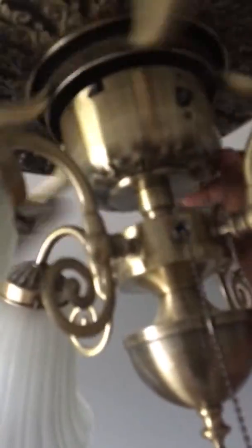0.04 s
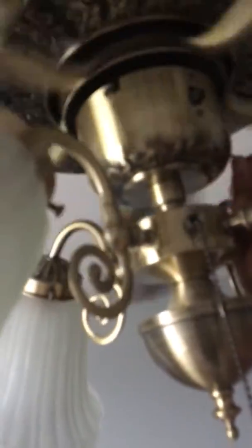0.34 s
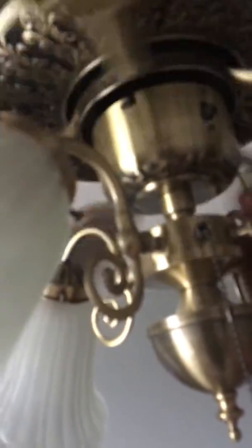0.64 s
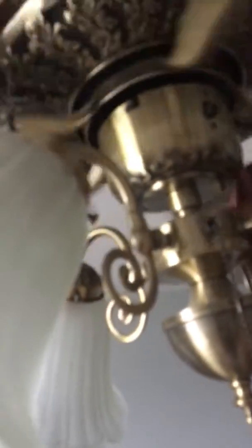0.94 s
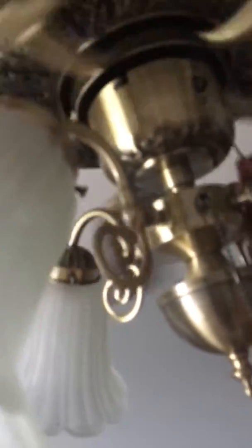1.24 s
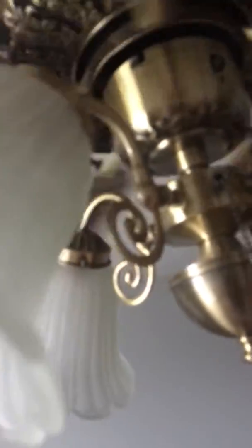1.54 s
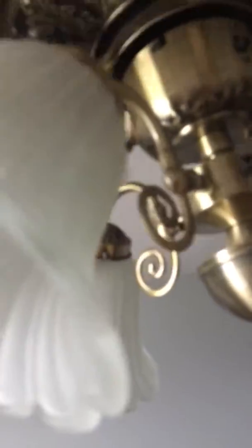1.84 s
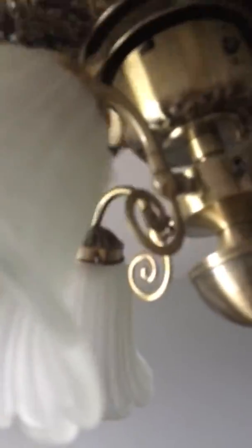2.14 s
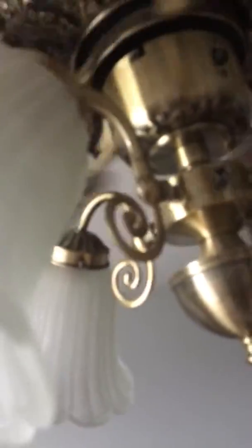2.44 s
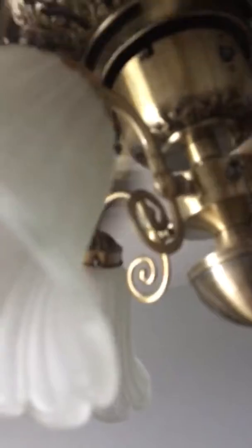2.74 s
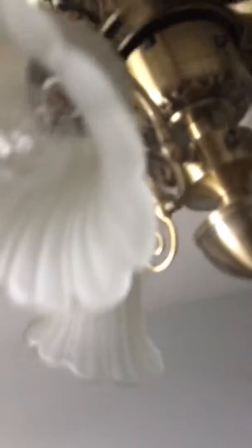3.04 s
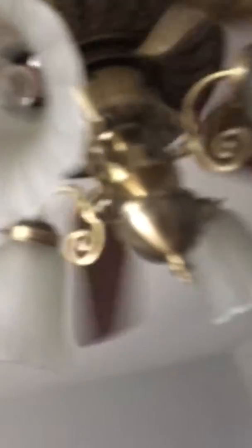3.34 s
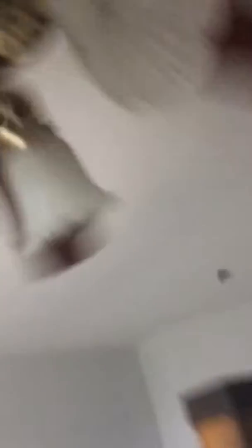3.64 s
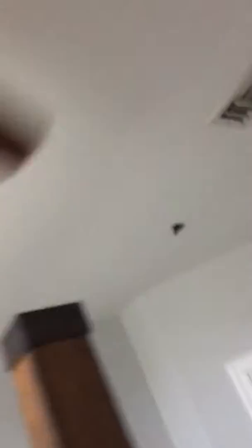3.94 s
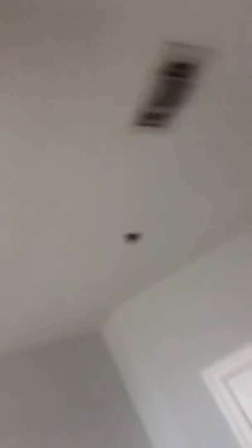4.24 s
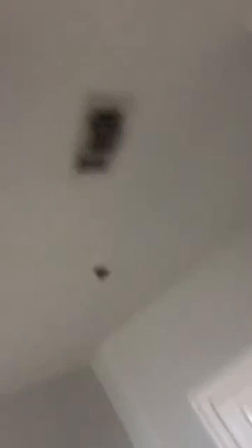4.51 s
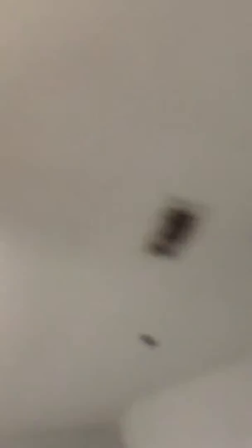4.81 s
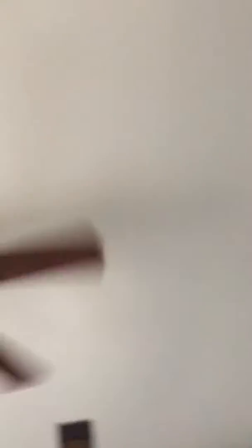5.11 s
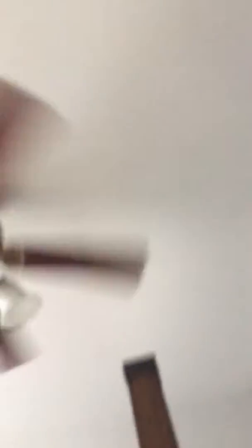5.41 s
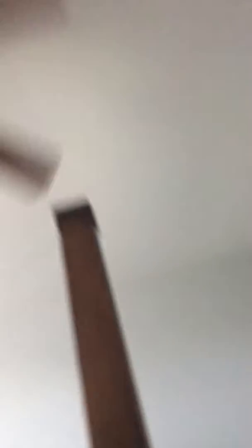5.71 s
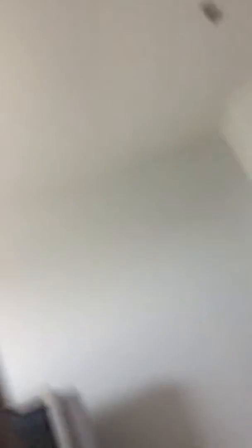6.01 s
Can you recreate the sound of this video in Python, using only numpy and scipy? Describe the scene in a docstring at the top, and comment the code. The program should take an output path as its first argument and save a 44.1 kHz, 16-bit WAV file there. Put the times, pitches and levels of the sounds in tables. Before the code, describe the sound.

In a bedroom, a ceiling fan stirs the air with a soft low hum. Right by the microphone, its chain switch ticks and snaps sharply through three pulls and returns, the mount thudding softly and the hum swelling after the second pull. A bright metal ping follows as the chain hits the lamp. Soft sleeve-like rushes and low thumps take over as the microphone moves away, with a finger knock and a brief squeak.

```python
"""Dry ratchet ticks and a hard snap, very close, over the soft air and hum of a brass ceiling fan in a bedroom.
Its pull-chain switch is worked three times: the pawl rings the housing, the mount thuds and the motor
hum changes level with the speed setting. The chain, let go, pings against the lamp. Then the phone is
carried away: soft rushes like a sleeve brushing by, deep thuds, a finger bump and a small squeak."""
import sys
import numpy as np
from scipy import signal
from scipy.fft import rfft, irfft
from scipy.io import wavfile
from scipy.ndimage import uniform_filter1d

SR = 44100
rng = np.random.default_rng(int(sys.argv[2]) if len(sys.argv) > 2 else 0)


def wrap_up_sound(samples):
    """Save the sound to the file named by the first command line argument, as 16-bit audio."""
    columns = np.atleast_2d(samples).T
    # keep every value between -1 and 1, then stretch to whole-number steps
    tamed = np.clip(columns, -1, 1)
    steps = np.round(tamed * 32767).astype(np.int16)
    wavfile.write(sys.argv[1], SR, steps)


N = 267642
TIME = np.arange(N) / SR

# The switch's strokes, pull and return in turn. Each row: snap time in seconds, level in dB, knock and
# treble in dB relative to that level, resonance of the snap in Hz, resonance of its ticks in Hz.
STROKES = [(0.5308, -30.5, -7, -11, 3330, 3350), (0.8976, -31.5, -3, -5, 2070, 3380),
           (1.343, -30, -9.5, -11.5, 3230, 3350), (1.715, -28.5, -8, -2.5, 1950, 1980),
           (2.337, -34.5, -3.5, -8, 3030, 3280), (2.833, -30, -3.5, -2, 2350, 2110)]


def undb(db):
    """Decibels to gain."""
    return 10 ** (np.asarray(db) / 20)


def unit(x):
    """Scale to rms 1."""
    return x / np.sqrt(np.mean(x ** 2))


def add(track, s, sound):
    """Mix a sound into a track at time s."""
    i = int(s * SR)
    track[i:i + len(sound)] += sound[:N - i]


def band(x, lo_hz, hi_hz, order=3):
    """Causal band-pass."""
    sos = signal.butter(order, [lo_hz, min(hi_hz, .49 * SR)], "band", fs=SR, output="sos")
    return signal.sosfilt(sos, x)


def fade(t, t60):
    """Exponential decay, 60 dB down after t60."""
    return np.exp(-np.log(1000) * t / t60)


def swell(s, half_s):
    """A smooth rise and fall around time s, peaking at 1."""
    return np.exp(-((TIME - s) / half_s) ** 2)


def noise(colour):
    """Noise of rms 1, shaped by (Hz, dB) points."""
    hz, db = np.transpose(colour)
    bins_hz = np.maximum(np.fft.rfftfreq(N, 1 / SR), 1)
    gain = undb(np.interp(np.log(bins_hz), np.log(hz), db))
    return unit(irfft(rfft(rng.standard_normal(N)) * gain, N))


def walk(rate_hz, size=N):
    """Smooth random wander of rms 1."""
    hold = int(SR / rate_hz)
    steps = np.repeat(rng.standard_normal(size // hold + 1), hold)
    return unit(uniform_filter1d(steps, hold)[:size])


def ring(modes, t, scatter_db, detune):
    """Struck modes; level, pitch and polarity vary with every blow."""
    chance = rng.standard_normal((len(modes), 3))
    out = np.zeros(len(t))
    for (hz, db, t60), (louder, sharper, polarity) in zip(modes, chance):
        tone = np.sign(polarity) * np.sin(2 * np.pi * hz * (1 + detune * sharper) * t)
        out += undb(db + scatter_db * louder) * fade(t, t60) * tone
    return out


def pulls():
    """Every other stroke is a pull: (snap s, tug dB, scrape dB, hum dB)."""
    # Each row: tug on the mount in dB, scrape of the chain in dB, hum of the new setting in dB.
    levels = [(-30.5, -2, -77), (-31, -9, -56.5), (-34, -10, -67)]
    return [(stroke[0], *pull) for stroke, pull in zip(STROKES[::2], levels)]


def room(x, wet_db, low_t60=0.49, mid_t60=0.41, high_t60=0.34, early_db=-11, early_t60=0.068):
    """Quick reflections from the ceiling and shades, then the room's tail, shorter in the treble."""
    t = np.arange(SR) / SR
    late, near = rng.standard_normal((2, SR))
    low = undb(1) * band(late, 150, 1500) * fade(t, low_t60)
    mid = band(late, 1500, 8000) * fade(t, mid_t60)
    high = undb(-4) * band(late, 8000, 17000) * fade(t, high_t60)
    tail = (low + mid + high) * (t > .008)
    early = near * fade(t, early_t60) * (t > .003)
    response = undb(wet_db) * tail / np.linalg.norm(tail) + undb(early_db) * early / np.linalg.norm(early)
    return x + signal.fftconvolve(x, response)[:N]


def air(db=-58.5, waver_db=1):
    """The steady wash of stirred air in the room."""
    # The air's spectrum. Each row: frequency in Hz, density in dB.
    colour = [(22, -36), (36, -8.5), (52, -5), (75, -8), (125, -12), (160, -19), (230, -20), (354, -16.5),
              (750, -35.5), (1000, -32), (2840, -40), (3340, -37), (4300, -46), (16000, -51.5)]
    return noise(colour) * undb(db + waver_db * walk(8.5))


def motor(hum_hz=120, first_db=-73.5, settle_s=0.073, leave_s=3.5, away_db=-5,
          drone_hz=99, drone_db=-53.5, rise_s=0.45, drift=0.01495):
    """Mains hum steps in level with each pull; on the strongest setting a lower drone beats against it."""
    settle = lambda x: uniform_filter1d(x, int(settle_s * SR))
    hum_db = np.full(N, first_db)
    for s, _, _, db in pulls():
        hum_db[TIME > s] = db
    hum_db += away_db * (TIME > leave_s)  # the phone is carried off
    hum = undb(settle(hum_db) + walk(2.5)) * np.sin(2 * np.pi * hum_hz * TIME)
    _, on_s, off_s = [pull[0] for pull in pulls()]
    build = settle((1 - np.exp(-np.maximum(TIME - on_s, 0) / rise_s)) * (TIME < off_s))
    phase = 2 * np.pi * np.cumsum(drone_hz * (1 + drift * walk(4.13))) / SR
    drone = undb(drone_db) * build * np.sin(phase)
    return np.sqrt(2) * (hum + drone)


def cloth_brushes(grain_db=0.72, flutter_db=2.5):
    """Cloth brushes past with a fine grain while air buffets the moving phone."""
    # Each row: middle in seconds, level in dB, half length in seconds, hiss in dB relative to the level.
    brushes = [(3.411, -60, 0.18, -8), (3.794, -63.5, 0.086, -3), (4.037, -62.5, 0.19, -12),
               (4.279, -59.5, 0.14, -5.5), (4.77, -55, 0.15, -6.5), (4.896, -48, 0.055, -4),
               (5.01, -50, 0.097, -5.5), (5.23, -56.5, 0.31, -5.5), (5.66, -51.5, 0.12, -3),
               (5.874, -62.5, 0.38, -7)]
    # The spectra of the cloth and of the buffeting air. Each row: frequency in Hz, density in dB.
    cloth_colour = [(350, -3), (520, -1.5), (800, -4), (1050, -2.5), (2500, -6.5), (3900, -12),
                    (4850, -17.5), (6000, -16), (10500, -25), (16000, -25.5)]
    buffet_colour = [(25, -18), (45, -3), (65, -7.5), (100, -1.5), (135, 1.5), (170, -1.5), (260, -3),
                     (380, -9), (550, -36), (1000, -43)]
    s, level_db, half_s, hiss_db = np.transpose(brushes)
    shapes = np.array([swell(*brush) for brush in zip(s, half_s)])
    envelope = lambda db: np.sqrt(undb(db) ** 2 @ shapes ** 2)  # overlaps add in power
    cloth = noise(cloth_colour) * undb(grain_db * walk(130))
    rush = envelope(level_db) * unit(band(cloth, 396, 3500))
    hiss = envelope(level_db + hiss_db) * unit(band(cloth, 4350, 13600))
    buffet_db = -59 + 1.02 * (level_db + 56) - 0.8657 * hiss_db  # heavy, dull brushes buffet most
    buffet = noise(buffet_colour) * envelope(buffet_db) * undb(flutter_db * walk(23))
    return rush + hiss + buffet


def grip_thuds(half_cycles=1.05):
    """The hand shifts on the phone: a cycle or two of deep pressure each time."""
    # Each row: middle in seconds, peak level in dB, pitch in Hz.
    thuds = [(3.59, -49, 71), (3.778, -47, 57), (4.098, -39.5, 113), (4.219, -39.5, 64.5), (4.3, -36.5, 56),
             (4.833, -40, 64.4), (5.187, -41.5, 52), (5.309, -38.5, 46.6), (5.618, -41.5, 51)]
    return sum(undb(db) * swell(s, half_cycles / hz) * np.sin(2 * np.pi * (hz * (TIME - s) + rng.random()))
               for s, db, hz in thuds)


def finger_bump(s=5.4195, db=-32, start_hz=620, end_hz=190, sag_s=0.0023, width_s=0.0018):
    """A finger knocks the phone: two dull, sinking cycles."""
    out, t = np.zeros(N), np.arange(SR // 30) / SR
    hz = end_hz + (start_hz - end_hz) * np.exp(-t / sag_s)
    envelope = t / width_s * np.exp(-(t / width_s / 2) ** 2)
    add(out, s, undb(db) * envelope * np.sin(2 * np.pi * np.cumsum(hz) / SR))
    return out


def squeak(s=5.468, hz=1508, db=-37, half_s=0.0069, octave_db=-22, tail_db=-13, tail_s=0.031):
    """Something rubs and sings for a moment, nearly a pure tone, and trails off unevenly."""
    phase = 2 * np.pi * np.cumsum(hz * (1 + 0.0091 * walk(120))) / SR
    envelope = swell(s, half_s) + undb(tail_db + 2.7 * walk(99)) * swell(s + tail_s, tail_s)
    return undb(db) * envelope * (np.sin(phase) + undb(octave_db) * np.sin(2 * phase))


def chain_beads(tick_db=-71, grain_db=4, per_s=70, slide_db=-61, rest_db=-24, lag_s=0.35, half_s=0.28):
    """The beads tick faintly and scrape in their guide, most of all lag_s after each pull."""
    t = np.arange(SR // 50) / SR
    contacts = (rng.random(N) < per_s / SR) * undb(grain_db * rng.standard_normal(N))
    burst = rng.standard_normal(len(t)) * fade(t, 0.059)
    ticks = band(signal.fftconvolve(contacts, burst)[:N], 3000, 13000)
    scrape = noise([(300, -21.5), (500, -10.5), (800, -0.5), (1300, 4.5), (2700, -9.5), (3500, -16),
                    (4300, -12), (6000, -10.5), (9000, -33), (16000, -45)])
    motion = undb(rest_db) + sum(undb(db) * swell(s + lag_s, half_s) for s, _, db, _ in pulls())
    return motion * (undb(tick_db) * unit(ticks) + undb(slide_db + 2 * walk(40)) * scrape)


def mount_boom(lead_s=0.042, push_s=0.039):
    """Each pull loads the fan's mount softly just ahead of the snap and leaves it booming."""
    # The mount's sway. Each row: frequency in Hz, level in dB, time to fall 60 dB in seconds.
    modes = [(56, -2, 0.32), (76, 0, 0.24), (86.7, 1.5, 0.27), (111, -7, 0.88), (210, -21, 0.54)]
    out, t = np.zeros(N), np.arange(SR) / SR
    push = 1 - np.exp(-(t / push_s) ** 2)
    for s, db, _, _ in pulls():
        add(out, s - lead_s, undb(db) * push * ring(modes, t, scatter_db=1, detune=0.005))
    return out


def lamp_pings():
    """Let go, the chain strikes the lamp and rebounds once."""
    # Each row: start in seconds, level in dB, change to the modes below 8 kHz in dB.
    pings = [(3.0735, -31.5, 0), (3.2863, -51, -12)]
    # The lamp's ring. Each row: frequency in Hz, level in dB, time to fall 60 dB in seconds.
    lamp = [(3690, -19, .28), (5755, -6, .2), (5764, -19, .5), (8737, -8, .05), (9290, 2, .045),
            (9390, -17, .2), (11070, -6, .07), (12300, -3, .05), (12970, -6, .05), (15450, -7, .05)]
    out, t = np.zeros(N), np.arange(SR // 2) / SR
    for s, db, lower_db in pings:
        # a glancing touch hardly wakes the lower modes
        modes = [(hz, mode_db + lower_db * (hz < 8000), t60) for hz, mode_db, t60 in lamp]
        tick = undb(4) * band(rng.standard_normal(len(t)), 6500, 16000, order=1) * fade(t, .04)
        add(out, s, undb(db) * (ring(modes, t, scatter_db=0.5, detune=0.0004) + tick))
    return out


def clicks(tension_s=0.09, loose_db=-10, tight_db=-4.5, slack_s=0.18, slack_db=-15.5, slack_hz=2040):
    """The ratchet's snaps and ticks as (s, level dB, knock dB, treble dB, resonance Hz)."""
    # Light ticks around the snaps. Each row: start in seconds, level in dB.
    ticks = [(0.3295, -42), (0.438, -42), (0.4916, -40.5), (0.5132, -35.5), (0.8018, -46.5),
             (0.8464, -36.5), (0.881, -38.5), (1.0908, -46.5), (1.286, -40.5), (1.3133, -38), (1.33, -39),
             (1.5887, -42.5), (1.6395, -42.5), (1.67, -50.5), (1.683, -45.5), (2.2416, -45),
             (2.2883, -43.5), (2.316, -40.5), (2.6712, -43.5), (2.7381, -45.5), (2.811, -45),
             (3.027, -47.5)]
    rows = [stroke[:-1] for stroke in STROKES]
    for s, db in ticks:
        snap_s, _, _, treble_db, _, hz = min(STROKES, key=lambda stroke: abs(stroke[0] - s))
        # the spring tightens toward each snap, and the tighter it is the more a tick knocks
        tension = np.exp(-((snap_s - s) / tension_s) ** 2)
        knock_db = loose_db + tension * (tight_db - loose_db)
        # ticks are brighter than their snap, unless the chain is slack
        colour = (slack_db, slack_hz) if abs(snap_s - s) > slack_s else (treble_db + 1.5, hz)
        rows.append((s, db, knock_db, *colour))
    return rows


def pawl_strike(t, weight, grinds, crack_db=9, heavy_db=4, crack_t60=0.03, rise_s=0.00058,
                grind_db=-10, grind_s=0.0066, rattle_db=-18, rattle_t60=0.13):
    """One drop of the pawl at t = 0: a few ms of metal chatter plus the ring of the housing."""
    # The housing's ring. Each row: frequency in Hz, level in dB, time to fall 60 dB in seconds.
    housing = [(454.7, -7.5, 0.1), (498.6, 0, .07), (537, -8, 0.07), (1161, -8, 0.061), (1321, -5.5, 0.051),
               (1567, -8.5, 0.071), (2017, -0.5, 0.02), (2500, -5.5, 0.023), (2611, -11.5, 0.076),
               (3237, -1, 0.043), (3700, -5.5, 0.061), (6640, -0.5, 0.011), (9340, 9.5, 0.013)]
    after = np.maximum(t, 0)
    chatter = undb(crack_db + heavy_db * weight) * rng.standard_normal(len(t))
    blow = chatter * fade(after, crack_t60) + ring(housing, after, scatter_db=2.5, detune=0.0062)
    # a heavy snap sets the loose parts rattling; a light tick may grind up its tooth first
    rattle = weight * chatter * undb(rattle_db + 3.85 * walk(250, size=len(t))) * fade(after, rattle_t60)
    friction = band(chatter, 300, 4600, order=1) * np.exp(-np.abs(t) / grind_s)
    grind = grinds * (1 - weight) * undb(grind_db) * friction
    return (blow + rattle) * (1 - np.exp(-after / rise_s)) + grind


def switch(resonance_db=3, width=0.054, clack_slope=0.36, fizz_slope=0.74):
    """Pawl strikes, coloured by how hard and where they land. Returns light ticks and heavy snaps."""
    ticks, snaps, lead = np.zeros(N), np.zeros(N), SR // 40
    t = np.arange(-lead, SR // 4) / SR
    attack = slice(lead, lead + SR // 100)  # the first 10 ms set each register's level
    for s, db, knock_db, treble_db, hz in clicks():
        weight = np.clip((db + 43) / 12, 0, 1)  # 0 for a light tick, 1 for a full snap
        hit = pawl_strike(t, weight, grinds=hz > 3000)
        # the point of contact favours one broad resonance
        resonance = undb(resonance_db) * band(hit, hz * (1 - width), hz * (1 + width), order=1)
        body = band(hit + resonance, 1750, 3875, order=4)
        # heavy snaps clack in the middle; light ticks have the shortest contact and fizz at the very top
        low = band(hit, 276, 757) + undb(clack_slope * (db + 28.5)) * band(hit, 900, 1470)
        top = band(hit, 5310, 9180) + undb(3 - fizz_slope * (db + 35.5)) * band(hit, 10930, 14860)
        registers = (low, knock_db), (body, 0), (top, treble_db)
        click = sum(part / np.std(part[attack]) * undb(db + gain_db) for part, gain_db in registers)
        add(ticks, s - lead / SR, (1 - weight) * click)
        add(snaps, s - lead / SR, weight * click)
    return ticks, snaps


def scene():
    """A mono mix: the switch and lamp ring into the room, the rest stays dry."""
    ticks, snaps = switch()
    metal = room(ticks, wet_db=-10.5) + room(snaps, wet_db=-11) + room(lamp_pings(), wet_db=-11.5)
    fan = metal + chain_beads() + mount_boom() + motor() + air()
    handling = cloth_brushes() + grip_thuds() + finger_bump() + squeak()
    return (fan + handling)[None]


def record(dry):
    """The phone cuts the top steeply above 16.1 kHz."""
    return signal.sosfilt(signal.ellip(8, .2, 70, 16100, fs=SR, output="sos"), dry)


dry = scene()
out = record(dry)
wrap_up_sound(out)
```